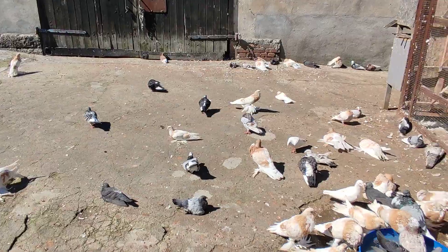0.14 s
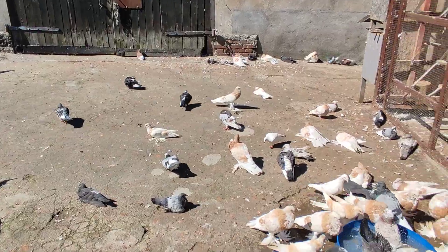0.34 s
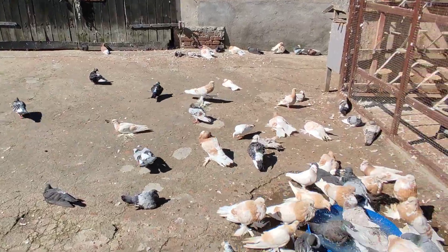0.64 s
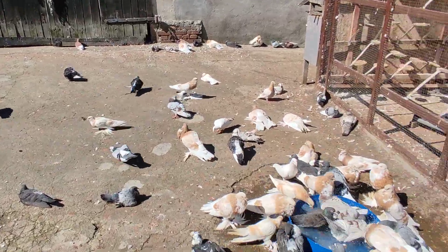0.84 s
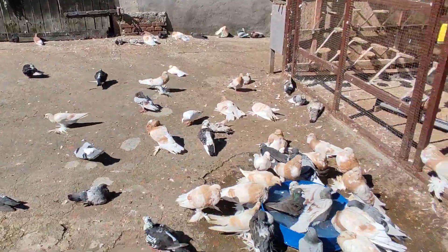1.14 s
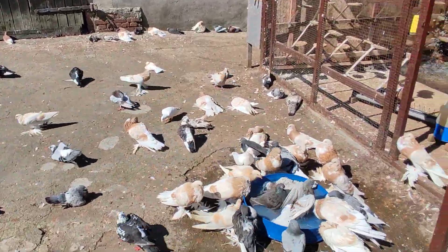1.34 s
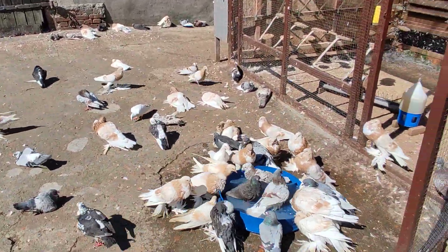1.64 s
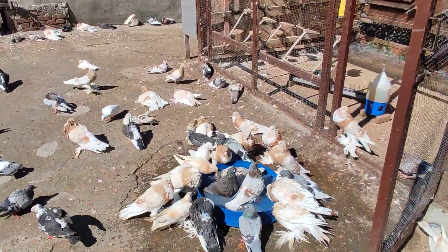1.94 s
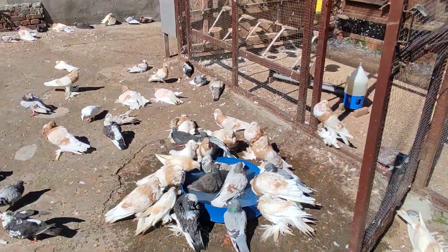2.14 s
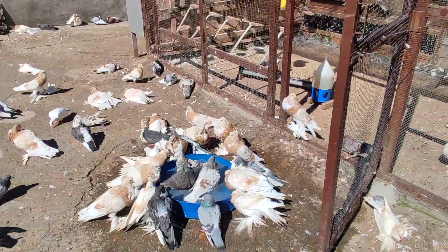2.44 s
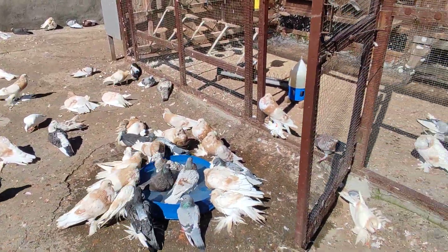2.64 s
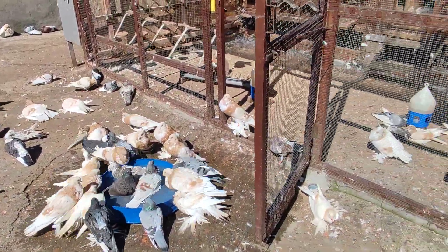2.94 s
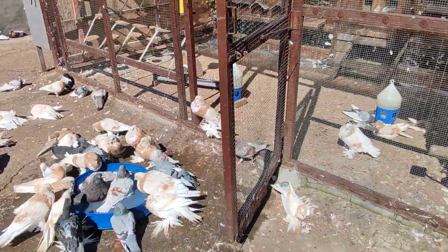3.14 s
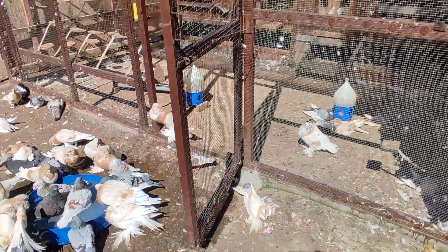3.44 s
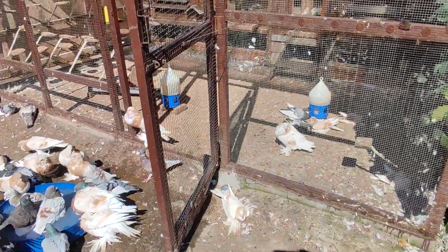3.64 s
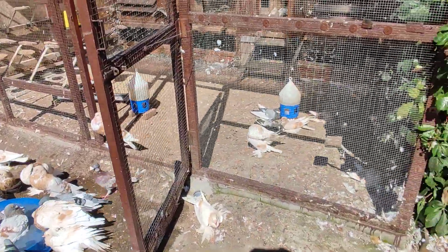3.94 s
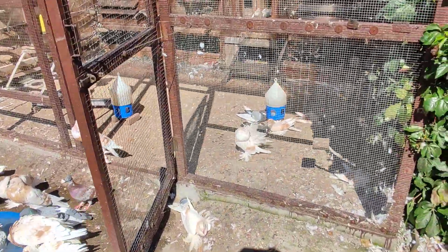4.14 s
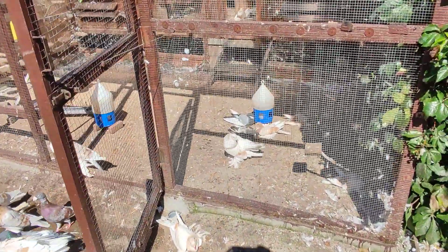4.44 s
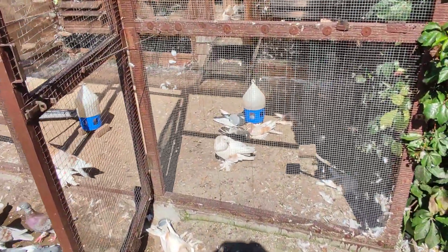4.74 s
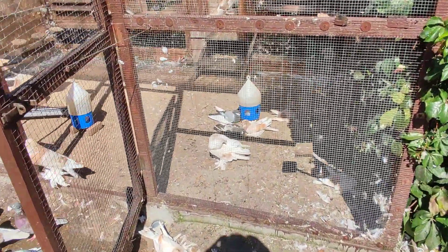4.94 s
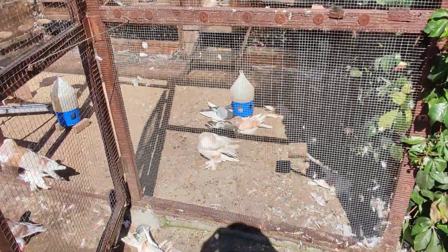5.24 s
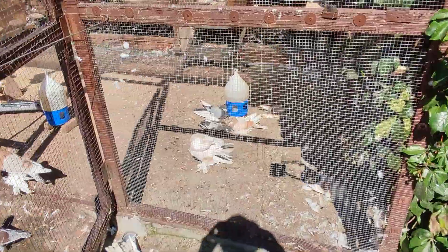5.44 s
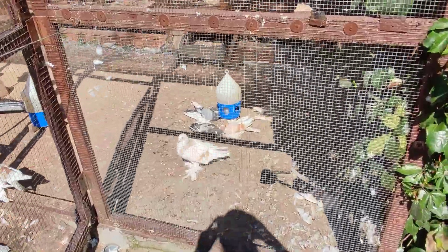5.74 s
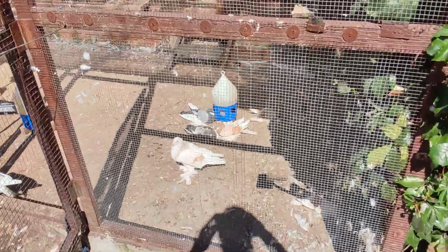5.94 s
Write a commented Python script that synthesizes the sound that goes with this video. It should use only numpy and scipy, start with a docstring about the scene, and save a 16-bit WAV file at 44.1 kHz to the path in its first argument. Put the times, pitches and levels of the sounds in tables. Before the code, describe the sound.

Pigeons coo in low, throaty, purring bouts a few steps away, with bathing splashes, feather rustles and sharp little ticks in a sunny yard.

```python
"""Pigeons courting and bathing in a walled yard

Pigeons are heard a few steps from a hand-held phone. Each coo is a harmonic tone arching in pitch and
loudness, roughened by modulation and rounded by a crop filter; short, chirped throaty pulses interrupt it.
Splashes and rustles are filtered random impacts and ringing bubbles; ticks and knocks are decaying noise.
A small bird whistles swept sines, and filtered noise lies under it all as low outdoor rumble and faint hiss.
"""
import sys
import numpy as np
from scipy import signal
from scipy.fft import rfft, irfft, next_fast_len
from scipy.io import wavfile
from scipy.ndimage import uniform_filter1d

SR = 44100
rng = np.random.default_rng(int(sys.argv[2]) if len(sys.argv) > 2 else 0)


def waveform_to_disk(signal):
    """Save audio, clipped to [-1, 1], as 16-bit WAV at the path in sys.argv[1]."""
    frames = np.transpose(np.atleast_2d(signal))
    scaled = np.clip(frames, -1, 1) * 32767
    samples = np.round(scaled).astype(np.int16)
    wavfile.write(sys.argv[1], SR, samples)


N = 268569
TIME = np.arange(N) / SR  # t/s

# Spectrum of the outdoor air noise: f/Hz, relative level/dB
AIR_SPECTRUM = [(12, -39.5), (20, 2.5), (45, 0.5), (106, -14), (439, -19.5), (811, -21.5), (1340, -30),
                (1580, -29), (3960, -36.5), (4950, -33), (6540, -39), (9930, -50.5), (15500, -37.5)]
AIR_DB = -56  # middle level
# Likeness of diffuse noise at the two microphones: f/Hz, correlation
MICROPHONE_LIKENESS = [(90, 0.59), (170, 0.8), (330, 1), (600, -0.23), (1100, 0.16), (6000, -0.037)]

# Bouts of splashing and rustling, with a short hiss after the hard knock near 3.56 s:
# t/s at the height, time/s from there to 1/e of the amplitude,
# spray level/dB and slosh level/dB before the trims in bath()
SPLASH_BOUTS = [(0.153, 0.031, -65.5, -73), (0.388, 0.17, -58, -59.5), (0.583, 0.26, -58.5, -57),
                (0.918, 0.4, -71, -72.5), (1.388, 0.076, -66.5, -65), (1.62, 0.46, -73, -69),
                (2.572, 0.054, -71.5, -71), (2.974, 1, -74, -75), (3.387, 0.13, -66, -67),
                (3.592, 0.051, -57.5, -61), (3.68, 0.25, -70, -73), (4.056, 0.15, -65, -67.5),
                (4.322, 0.035, -63.5, -66), (4.447, 0.29, -72, -68), (5.39, 0.37, -68, -64)]
TRICKLE_DB = -75.5  # steady floor under the bouts, before the same trims: the water never quite rests
# Spectra of the fine spray and of the stirred water: f/Hz, relative level/dB
SPRAY_SPECTRUM = [(1500, -22), (2500, -17.5), (3400, -10.5), (4600, -11.5), (7100, -3), (8400, -10),
                  (9600, -26.5), (12100, -8.5), (15500, -18.5)]
SLOSH_SPECTRUM = [(400, 1.5), (800, -6), (1300, -10.5), (1800, 0.5), (2500, -5), (4000, -17.5)]
BUBBLE_RATE, BUBBLE_HZ = 380, 1633  # small bubbles per second, their middle pitch
PIP_RATE, PIP_HZ = 110, 5530  # fine drops landing per second, their middle pitch
# Single bubbles that stand out of the splashing:
# t/s, level/dB before the ringing envelope, starting f/Hz, cycles of ringing down to 1/e
LOUD_BUBBLES = [(0.252, -43.5, 1780, 5.4), (0.3445, -32, 1840, 7), (0.422, -43, 1780, 6.6),
                (0.463, -44, 980, 7.1), (0.502, -45.5, 1370, 8.6), (0.615, -51, 1750, 8.7),
                (0.649, -47, 1180, 17.8), (2.0505, -44, 1830, 3.4), (2.074, -49, 1646, 9)]

# Beak and claw ticks: t/s, noise level/dB before envelope and filters,
# knock level/dB before a common lift, fine edge level/dB, 60 dB decay time/s
CLAW_TICKS = [(0.364, -43, 1, 15.5, 0.022), (0.5711, -39.5, -9, 9, 0.035), (0.699, -39, -20, 4, .014),
              (0.74, -42, -6, 10, 0.022), (0.8317, -42, -10, 13.5, 0.013), (0.8787, -43.5, -23, 7, 0.011),
              (2.302, -48.5, 2, 8, 0.0082), (2.751, -42.5, -31, -2, 0.022), (3.181, -40.5, -31, 4, 0.013),
              (3.561, -23.5, -11.5, 9, 0.015), (3.564, -23, -12, 1.5, 0.026), (4.041, -42.5, -13, 5, 0.054),
              (4.3394, -31.5, -18, 20, 0.0091), (4.986, -50, -6, 12, 0.02), (5.2742, -44, -12.5, 4, 0.042),
              (5.6843, -42, -4, -18, 0.016), (5.9382, -36.5, -12, -11, 0.0049)]
# Filters for a tick's ring, its fine edge and the knock of what is struck: f/Hz, response level/dB
RING_RESPONSE = [(1500, -88), (3000, -26), (4400, 4), (5500, -3.5), (7000, 7), (8500, -2.5), (11000, -81)]
EDGE_RESPONSE = [(7000, -91), (10000, -11.5), (12500, -9.5), (15500, -10)]
KNOCK_RESPONSE = [(200, 17.5), (600, 1.5), (1000, 5), (1400, -3.5), (1900, 6), (3000, 2.5), (6000, -25)]
# Dull knocks: pecks, and perhaps splashes among the bathing:
# t/s, peak level/dB before panning, resonance f/Hz, 60 dB decay time/s of the exciting noise
DULL_KNOCKS = [(0.3312, -43, 1670, 0.035), (0.4866, -55, 1530, .015), (3.9328, -48, 1980, 0.019),
               (4.165, -49, 1280, 0.026), (4.1763, -47, 1570, 0.017), (5.3975, -44, 1860, .028)]

# Thin chirps of a small bird: start t/s, length/s, starting f/Hz, peak level/dB
SMALL_BIRD_CHIRPS = [(1.947, 0.14, 7630, -70), (2.074, 0.048, 7770, -65.5), (2.865, 0.061, 2240, -68)]

# Where the calling birds are heard, as one or another calls:
# t/s, left minus right level/dB, lead of the left microphone/s
BIRD_BEARING = [(0, -0.5, -.00015), (2, 2.8, .00005), (3.4, -.5, .00025), (4.6, -2, .0004), (5.2, 1.5, 0),
                (5.8, 0.2, .0003)]
# Throaty stutters: t/s at the middle, peak level/dB before a common trim, middle f/Hz,
# time/s from there to 1/e of the amplitude, overtone level/dB relative to the fundamental
THROAT_STUTTERS = [(0.108, -31.5, 287.5, 0.005, -40), (1.883, -40, 320, 0.0052, -33),
                   (1.976, -37.5, 314, 0.0062, -32), (1.998, -42, 272, 0.0052, -36),
                   (2.085, -42, 297, 0.0089, -23), (2.517, -33, 328, 0.0041, -30),
                   (2.576, -35, 338, 0.0058, -21), (2.642, -34.5, 384, 0.0054, -17),
                   (2.719, -36.5, 334.4, 0.0095, -19.5), (3.963, -43.5, 348, 0.009, -11.5),
                   (4.034, -41, 331, 0.0062, -14), (4.055, -42.5, 287, 0.0063, -19),
                   (4.083, -42.5, 307, 0.0049, -8), (4.131, -37.5, 317, 0.0046, -12),
                   (4.188, -40, 347.7, 0.0082, -6.5), (4.242, -39.5, 301, 0.0043, -10),
                   (4.528, -37.5, 300, 0.007, -21), (4.62, -37, 460, .008, -23),
                   (5.245, -30, 342.3, 0.0091, -38), (5.617, -35, 243, 0.0051, -10.5)]
# Coos: start t/s, crest t/s, end t/s, opening f/Hz, crest f/Hz, closing f/Hz, crest level/dB,
# roughness 0-1, second harmonic level/dB relative to the first, before the crop
COO_NOTES = [ (-.1, 0.022, .14, 138, 143, 156, -43.5, 0.44, -0.5),
             (.16, 0.177, .26, 159.4, 144, 147.1, -41, 0.32, 5),
             (.27, 0.333, .35, 148.1, 151.3, 166, -41.5, 0.16, 3.5),
             (.36, 0.349, .44, 156, 155.3, 149.3, -47.5, 0.64, 1.5),
             (.455, 0.501, .61, 150, 159.9, 176, -54.5, 0.54, 3),
             (1.361, 1.401, 1.425, 179, 206.4, 185, -59, 0.6, 7.5),
             (1.7, 1.75, 1.83, 158, 199.4, 169, -59, 0.65, 1.5),
             (1.875, 1.883, 1.94, 205, 205.7, 198, -56.5, 0.35, 2),
             (1.973, 1.99, 2.03, 216, 226.7, 207, -56.5, 0.41, 16),
             (2.078, 2.087, 2.14, 217, 219, 203, -56, 0.4, 1.5),
             (2.246, 2.283, 2.29, 205, 211, 200, -49.5, 0.56, 3),
             (2.3, 2.345, 2.39, 307, 286, 241, -47, 0.19, -29),
             (2.354, 2.361, 2.46, 206.5, 199.8, 183.4, -51, 0.17, 8),
             (2.405, 2.465, 2.53, 225.6, 245, 227, -50.5, 0.38, -4),
             (2.525, 2.599, 2.675, 238.6, 198, 189.5, -45, 0.46, 5),
             (2.7, 2.736, 2.79, 229, 204.4, 188, -53, 0.64, 5.5),
             (2.834, 2.848, 2.9, 231, 221.6, 193.7, -53, 0.45, 9),
             (2.894, 2.934, 3.11, 168.2, 194, 190.2, -48, 0.56, 1.5),
             (2.958, 3.008, 3.1, 205.4, 278.6, 215, -45.5, 0.1, -31),
             (3.109, 3.147, 3.18, 188, 163.7, 139, -45.5, 0.25, 9),
             (3.19, 3.427, 3.575, 160.8, 160.4, 160.5, -42.5, 0.19, 3.5),
             (3.78, 3.873, 3.94, 161.5, 187.7, 179, -55.5, 0.97, -6.5),
             (4.03, 4.172, 4.26, 240.2, 344.6, 255, -51.5, 0.81, 2.5),
             (4.287, 4.381, 4.43, 237.8, 196, 223, -51.5, 0.64, 4.5),
             (4.445, 4.519, 4.565, 225.7, 266, 292, -48, 0.54, 8),
             (4.6, 4.612, 4.655, 280, 263, 239, -48, .3, 5),
             (4.66, 4.708, 4.76, 348, 337, 272, -56, 0.14, -38),
             (4.765, 4.792, 4.85, 260, 233, 204, -55.5, 0, -20),
             (4.773, 4.858, 4.92, 243.5, 197.2, 136, -57, 0.23, 10),
             (4.85, 4.893, 4.97, 208.3, 259.3, 191.3, -53, 0.42, 2.5),
             (5.043, 5.104, 5.13, 155, 184, 205, -52, 0.42, -2.5),
             (5.14, 5.157, 5.185, 216, 218, 262, -44, 0.25, -4),
             (5.197, 5.226, 5.25, 304.4, 354, 345, -42, 0.1, -21.5),
             (5.265, 5.296, 5.345, 240, 283, 226, -46, 0.21, -12),
             (5.357, 5.366, 5.405, 231, 204, 218, -45.5, 0.26, -5),
             (5.465, 5.515, 5.59, 151.6, 163.6, 154, -45.5, 0.37, -1.5),
             (5.61, 5.73, 5.81, 168.9, 157.8, 146.5, -45.8, 0.63, -1.5),
             (5.885, 6.079, 6.25, 199, 181.4, 175, -47, 0.51, -2)]
# What the crop and neck let through: f/Hz for a slack crop, response level/dB
CROP_RESPONSE = [(60, -23), (150, -10), (220, 1.5), (310, 0), (400, 0.5), (500, -7.5), (600, -16),
                 (800, -19), (1200, -33), (2500, -78)]
CROP_TIGHTENS_HZ = 243  # above this crest pitch the crop's resonance rises with the voice
SWELL_DB, EBB_DB = 3, 3  # how far a coo's start and end lie under its crest
ARCH = 1.027  # shape of the pitch arch: 1 rounded, more is pointed
HELD_S = .3  # a coo longer than this is held, and a smooth one throbs in level and pitch:
WARBLE_HZ, WARBLE_DB, WARBLE_SHARE = 8.97, 1.5, 0.058  # rate, level swing, pitch swing as a fraction

TOP_HZ = 15800  # upper band edge of the phone


def undb(db):
    """Level in decibels is twenty times the logarithm of amplitude; return the amplitude."""
    return 10 ** (np.asarray(db) / 20)


def unit(x):
    """Root-mean-square normalization: scale to rms 1."""
    return x / np.sqrt(np.mean(x ** 2) + 1e-20)


def across(points, size):
    """Interpolation along logarithmic frequency: spread (f/Hz, value) points over spectral bins."""
    hz, value = np.transpose(points)
    bins_hz = np.maximum(np.fft.rfftfreq(size, 1 / SR), 1)
    return np.interp(np.log(bins_hz), np.log(hz), value)


def colour(x, points, size=16384):
    """Minimum-phase filtering: folding the cepstrum makes a causal filter of the given response."""
    cepstrum = irfft(np.log(undb(across(points, size))))
    cepstrum[1:size // 2] *= 2
    cepstrum[size // 2 + 1:] = 0
    response = irfft(np.exp(rfft(cepstrum)))
    return signal.fftconvolve(np.atleast_2d(x), response[None], axes=-1)[:, :N]


def diffuse(size):
    """Diffuse-field coherence: mid and side noise are weighted to set the correlation in each band."""
    padded = 2 * next_fast_len(size // 2 + 1)
    alike = np.clip(across(MICROPHONE_LIKENESS, padded), -1, 1)
    weights = np.sqrt([1 + alike, 1 - alike])
    mid, side = rfft(rng.standard_normal((2, padded))) * weights
    return unit(irfft(np.array([mid + side, mid - side]))[:, :size])


def walk(rate_hz):
    """Band-limited random modulation: smoothed random steps of rms 1."""
    k = max(int(SR / rate_hz), 1)
    steps = np.repeat(rng.standard_normal(N // k + 1), k)
    return unit(uniform_filter1d(steps, k)[:N])


def pan(x, db):
    """Interchannel level difference: make the left channel louder than the right by db."""
    return x * undb(np.vstack([db, -db]) / 2)


def add(track, s, sound):
    """Superposition: mix a short sound in at time s."""
    start = int(np.clip(s * SR, 0, N - 1))
    track[..., start:start + sound.shape[-1]] += sound[..., :N - start]


def yard(x, wet_db, t60, gap_s=0.013):
    """Reverberation: walls and cages scatter a delayed, exponentially decaying tail."""
    t = TIME[:SR // 2]
    onset = np.clip(t / gap_s - 1, 0, 1)  # silent up to gap_s, full at twice that
    tail = diffuse(len(t)) * undb(-60 * t / t60) * onset
    tail /= np.sqrt(np.sum(tail ** 2) / 2)
    scattered = signal.fftconvolve(np.atleast_2d(x), tail, axes=-1)[:, :N]
    return x + undb(wet_db) * scattered


def air(swell_db=1):
    """Broadband diffuse noise: low outdoor rumble and a faint hiss, swelling slightly at random."""
    level_db = AIR_DB + swell_db * np.tanh(walk(9.8))
    return unit(colour(diffuse(N), AIR_SPECTRUM)) * undb(level_db)


def droplets(rate, spread_db):
    """Shot noise: a shower of tiny random impacts of uneven size, rate per second."""
    size = undb(spread_db * np.minimum(rng.exponential(size=N), 4))
    lands = rng.random(N) < rate / SR
    return lands * size * rng.standard_normal((2, N))


def bubble(hz, cycles, rise=0.053, quiver=0.35):
    """Bubble resonance: a damped, unsteady ring rises in pitch as the bubble nears the surface."""
    t = TIME[:SR // 12]
    age = t * hz / cycles  # in decay times
    pitch = hz * (1 + rise * age + quiver * rng.standard_normal(len(t)))
    phase = 2 * np.pi * np.cumsum(pitch) / SR
    envelope = np.exp(-age) * (1 - np.exp(-4 * age))
    return envelope * np.sin(phase + rng.uniform(0, 2 * np.pi, (2, 1)))


def froth(rate, middle_hz, spread_octaves=0.61, cycles=6, scatter_db=4):
    """Superposed resonators: a crowd of small bubbles with random times, pitches and levels."""
    out = np.zeros((2, N))
    for when, octave, size in rng.uniform(-1, 1, (int(rate * N / SR), 3)):
        ring = bubble(middle_hz * 2 ** (spread_octaves * octave), cycles)
        add(out, (when + 1) / 2 * N / SR, undb(scatter_db * size) * ring)
    return unit(out)


def bath(spray_trim_db=1.14, slosh_trim_db=-1.8, froth_db=-5, pips_db=-9, flutter_db=5):
    """Modulated impact noise: bouts of fine spray, rustle and stirred water swell and die away."""
    power = undb(TRICKLE_DB) ** 2
    for s, length_s, *levels_db in SPLASH_BOUTS:
        swell = np.exp(-2 * ((TIME - s) / length_s) ** 2)
        power = power + undb(levels_db)[:, None] ** 2 * swell
    spray_level, slosh_level = np.sqrt(power)
    pips = froth(PIP_RATE, PIP_HZ, spread_octaves=0.538, cycles=26, scatter_db=8)
    spray = unit(colour(droplets(5000, 1.54), SPRAY_SPECTRUM)) + undb(pips_db) * pips
    spray = spray * spray_level * undb(spray_trim_db)
    bubbles = froth(BUBBLE_RATE, BUBBLE_HZ)
    slosh = unit(colour(droplets(4000, 2.4), SLOSH_SPECTRUM)) + undb(froth_db) * bubbles
    slosh = slosh * slosh_level * undb(slosh_trim_db)
    flutter = undb(flutter_db * np.tanh(walk(55)))
    return (pan(spray, 2.3) + pan(slosh, -3.5)) * flutter


def plops(lean_db=-2):
    """Isolated bubble resonance: single bubbles that stand out of the splashing."""
    out = np.zeros((2, N))
    for s, db, hz, cycles in LOUD_BUBBLES:
        add(out, s, undb(db) * bubble(hz, cycles, rise=0.092, quiver=0.12))
    return pan(out, lean_db)


def ticks(attack_share=0.03, knock_lift_db=4, lean_db=0.5):
    """Impact excitation: a short noise crunch drives a bright ring, a fine edge and a struck body."""
    ring, body, edge = np.zeros((3, 2, N))
    t = TIME[:SR // 10]
    for s, db, knock_db, edge_db, t60 in CLAW_TICKS:
        attack = 1 - np.exp(-t / (attack_share * t60))
        decay = np.exp(-np.log(1000) * t / t60)
        crunch = rng.standard_normal((2, len(t))) * undb(db) * attack * decay
        add(ring, s, crunch)
        add(body, s, crunch * undb(knock_db + knock_lift_db))
        add(edge, s, crunch * undb(edge_db))
    bright = colour(ring, RING_RESPONSE) + colour(edge, EDGE_RESPONSE)
    return pan(bright + colour(body, KNOCK_RESPONSE), lean_db)


def dull_knocks(width_share=0.57, lean_db=-2):
    """Damped resonance: a decaying burst of noise rings one broad mode."""
    out = np.zeros((2, N))
    t = TIME[:SR // 10]
    for s, db, hz, t60 in DULL_KNOCKS:
        b, a = signal.iirpeak(hz, 1 / width_share, fs=SR)
        burst = rng.standard_normal((2, len(t))) * np.exp(-np.log(1000) * t / t60)
        knock = signal.lfilter(b, a, signal.lfilter(b, a, burst))
        add(out, s, undb(db) * knock / np.abs(knock).max(axis=1, keepdims=True))
    return pan(out, lean_db)


def chirps(rise=0.053, quiver=0.01364):
    """Frequency modulation: a small bird some way off whistles thin, slightly rising notes."""
    out = np.zeros(N)
    wobble = walk(600)
    for s, length_s, hz, db in SMALL_BIRD_CHIRPS:
        u = np.clip((TIME - s) / length_s, 0, 1)
        pitch = hz * (1 + rise * u + quiver * wobble)
        whistle = np.sin(2 * np.pi * np.cumsum(pitch) / SR)
        out += undb(db) * np.sin(np.pi * u) * whistle
    return out


def place(x):
    """Stereophonic localization: a bird to one side differs in level and arrival time between channels."""
    s, left_db, left_lead_s = np.transpose(BIRD_BEARING)
    db, lead_s = np.interp(TIME, s, left_db), np.interp(TIME, s, left_lead_s)
    left, right = [np.interp(TIME + side * lead_s / 2, TIME, x) for side in (1, -1)]
    return pan(np.array([left, right]), db)


def stutters(fall=0.1192, quiver=0.072, trim_db=-1):
    """Pulsed phonation: the syrinx pops open for a few uneven cycles while its pitch drops."""
    out = np.zeros(N)
    wobble = walk(500)
    for s, db, hz, half_s, overtone_db in THROAT_STUTTERS:
        u = np.arange(-3 * half_s, 3 * half_s, 1 / SR) / half_s
        pitch = hz * np.exp(-fall * u + quiver * wobble[int(s * SR):][:len(u)])
        phase = 2 * np.pi * np.cumsum(pitch) / SR + rng.uniform(0, 2 * np.pi)
        tone = np.sin(phase) + undb(overtone_db) * np.sin(2 * phase)
        add(out, s - half_s * u[-1], undb(db + trim_db) * np.exp(-u ** 2) * tone)
    return out


def held_tone():
    """Amplitude gating: the share of the coo that sounds on, each stutter interrupting it."""
    gaps = [1 - np.exp(-((TIME - s) / half_s) ** 2) for s, _, _, half_s, _ in THROAT_STUTTERS]
    return np.prod(gaps, axis=0)


def coos(jitter=0.1265, flutter_db=1.48, flutter_hz=50, rattle_db=10, rattle_hz=210, trill_hz=66,
         trill_wander=0.3525, third_db=-20, press_db=18, fade_s=0.01207):
    """Source and filter: a pressed syrinx purrs, rattles and brightens, and the crop rounds the sound."""
    out = np.zeros(N)
    wobble = walk(190)
    burst_db = rattle_db * np.tanh(walk(rattle_hz))
    waver_db = flutter_db * np.tanh(walk(flutter_hz))
    trill = np.cos(2 * np.pi * np.cumsum(trill_hz * (1 + trill_wander * walk(40))) / SR)
    for start, crest, end, open_hz, crest_hz, close_hz, crest_db, rough, second_db in COO_NOTES:
        # the fades lie just outside the start and end
        gate = np.clip(np.minimum(TIME - start, end - TIME) / fade_s + 1, 0, 1)
        sings = gate > 0
        t = TIME[sings]
        away = np.interp(t, [start, crest, end], [1, 0, 1])  # distance from the crest
        arch = np.abs(np.cos(np.pi / 2 * away)) ** (2 * ARCH)
        held = end - start > HELD_S
        throb = held * (1 - rough) * np.cos(2 * np.pi * WARBLE_HZ * (t - crest))

        edge_hz = np.where(t < crest, open_hz, close_hz)
        hz = (arch * crest_hz + (1 - arch) * edge_hz) * (1 + WARBLE_SHARE * throb)
        drop_db = np.where(t < crest, SWELL_DB, EBB_DB) * away ** 2
        db = crest_db - drop_db + WARBLE_DB * throb + waver_db[sings]

        phase = 2 * np.pi * np.cumsum(hz * (1 + jitter * rough * wobble[sings])) / SR
        tone = np.zeros(len(t))
        for harmonic, harmonic_db in enumerate([0, second_db, third_db + press_db * rough], 1):
            tone += undb(harmonic_db) * np.cos(harmonic * phase + rng.uniform(0, 2 * np.pi))
        purr = (1 + rough * trill[sings]) * undb(rough * burst_db[sings])

        tension = max(crest_hz / CROP_TIGHTENS_HZ, 1)
        crop = [(f * tension, response_db) for f, response_db in CROP_RESPONSE]
        voice = colour(tone * purr, crop)[0, :len(t)]
        # loudness follows the bird's effort, whatever the pitch
        voice /= np.sqrt(np.abs(uniform_filter1d(voice ** 2, size=1200)) + 1e-9)
        out[sings] += voice * gate[sings] * undb(db)
    return out


def scene():
    """Superposition in one space: voices, water and contacts share the yard over the outdoor air."""
    outdoors = air()
    water = yard(plops() + bath(), wet_db=-10.0, t60=0.26)
    contacts = yard(ticks() + dull_knocks(), wet_db=-12.5, t60=0.11, gap_s=0.0022)
    pigeons = place(coos() * held_tone() + stutters())
    birds = yard(pigeons + chirps(), wet_db=-7.5, t60=.3)
    return birds + contacts + water + outdoors


def record(dry):
    """Band limitation: the phone cuts the top with a steep elliptic low-pass."""
    low_pass = signal.ellip(8, .2, 70, TOP_HZ, fs=SR, output="sos")
    return signal.sosfilt(low_pass, dry)


dry = scene()
out = record(dry)
waveform_to_disk(out)
```